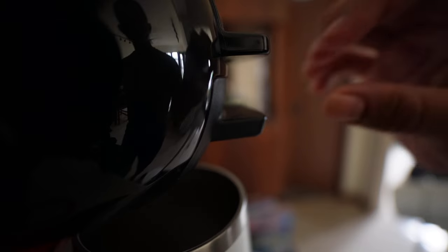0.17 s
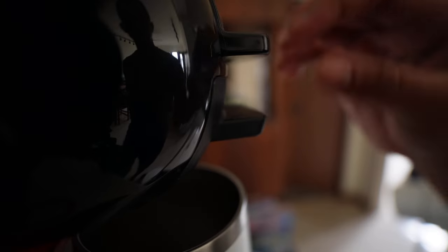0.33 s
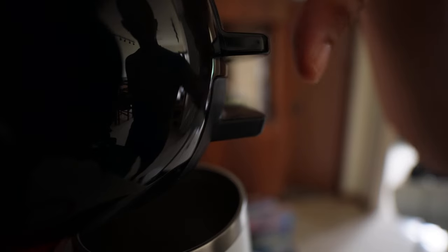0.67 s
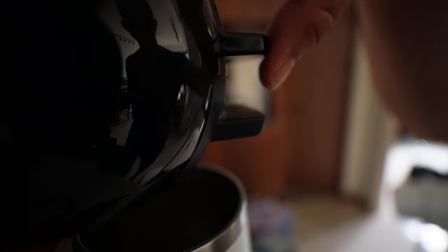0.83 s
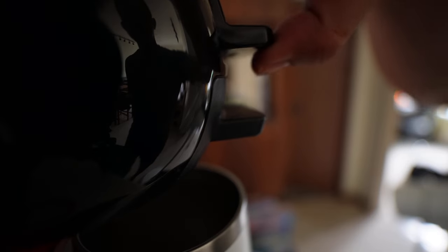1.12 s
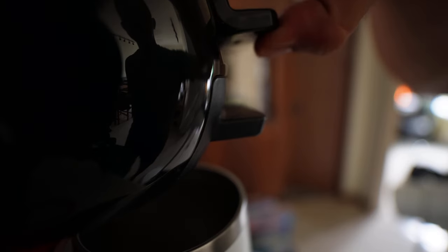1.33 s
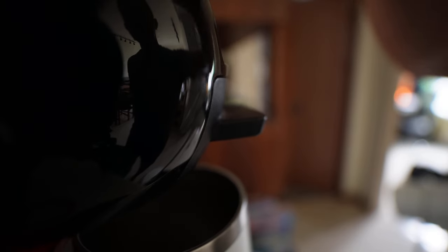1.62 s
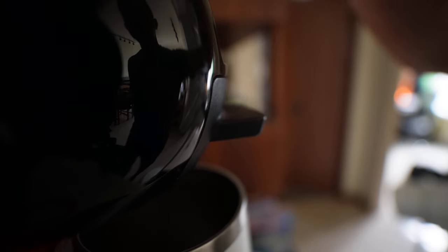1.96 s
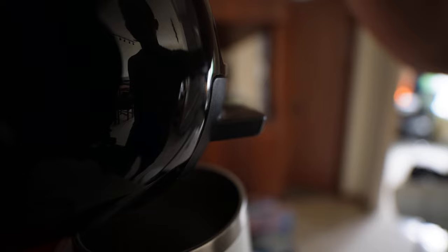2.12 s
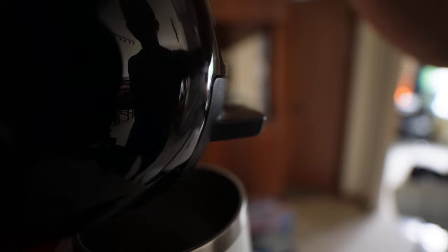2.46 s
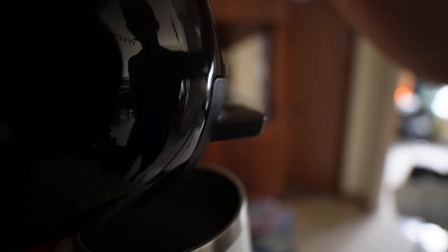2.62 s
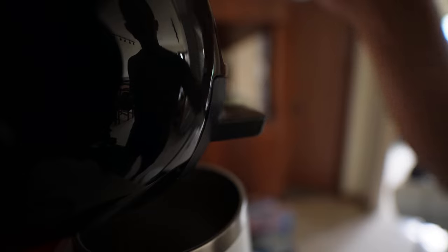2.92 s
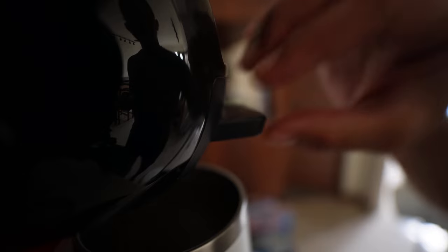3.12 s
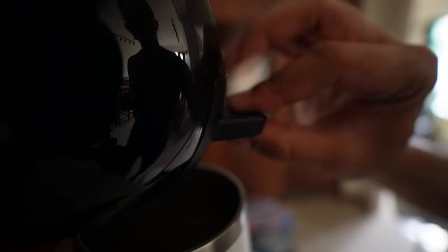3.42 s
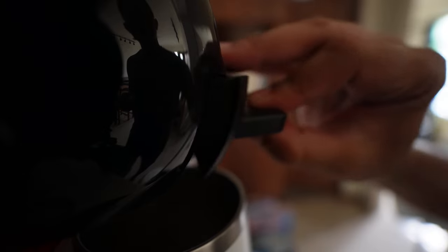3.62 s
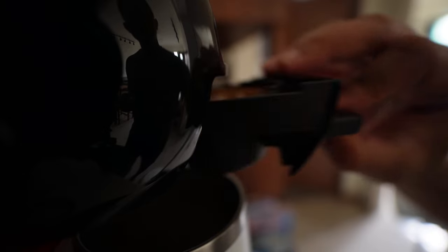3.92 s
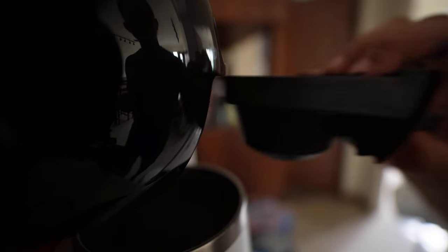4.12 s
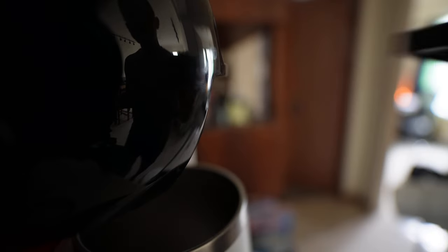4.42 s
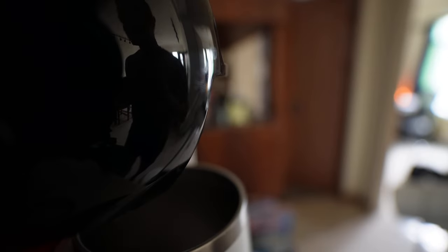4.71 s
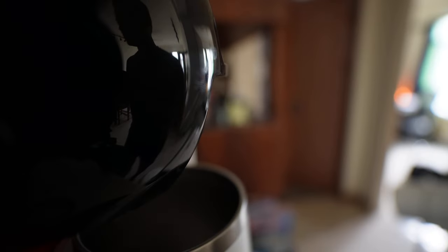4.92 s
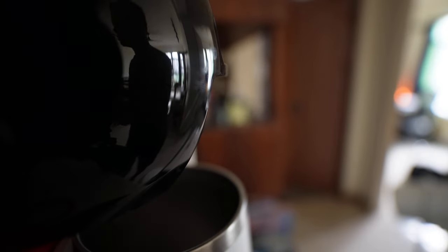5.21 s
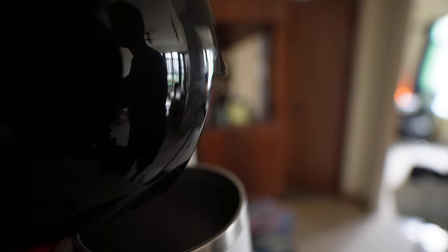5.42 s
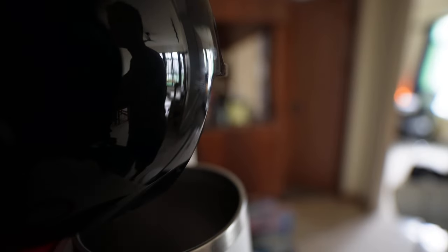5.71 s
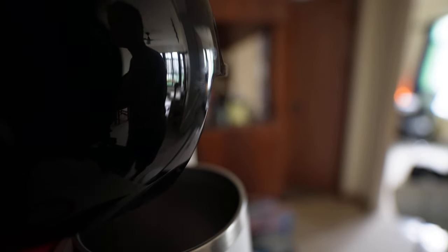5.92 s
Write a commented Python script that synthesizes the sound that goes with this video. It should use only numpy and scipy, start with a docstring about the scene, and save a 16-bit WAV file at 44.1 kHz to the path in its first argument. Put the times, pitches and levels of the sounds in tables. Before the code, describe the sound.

Faint, steady room noise fills a small kitchen. From about 0.9 seconds, close to the microphone, the lever of a capsule coffee machine ratchets up in a quick, uneven run of sharp plastic clicks and hollow knocks. At 1.6 seconds the capsule drops inside with a loud knock, bounces and briefly rumbles to rest. A click at 2 seconds leads to the loudest clack at 2.2 as the lever opens. The room rings lightly after each hit. Following a pause, the holder unlatches at 3.4 seconds, scrapes softly out of its slot until 4, and comes free with a few light knocks. A very faint, high camera focus whine comes and goes. At 5.6 seconds, further off, a tap hisses air, then spurts water into a steel sink around 5.8 with a short, drumming splash and a soft low boom.

```python
"""Capsule coffee machine in a small kitchen

Close to the microphone a lever ratchets up and clacks open; the capsule drops inside and rolls to rest.
Each plastic contact snaps and rings the shell and hollow housing. The holder unlatches and scrapes out.
Further off, a tap hisses air and spurts water into a steel sink. The room rings behind the machine,
and the camera's focus motor whines faintly over the room tone."""
import sys
import numpy as np
from scipy import signal
from scipy.fft import rfft, irfft
from scipy.io import wavfile
from scipy.ndimage import uniform_filter1d

SR = 44100
rng = np.random.default_rng(int(sys.argv[2]) if len(sys.argv) > 2 else 0)


def int16_out(signal):
    """Quantize to a 16-bit WAV file."""
    q = np.round(np.clip(np.atleast_2d(signal).T, -1, 1) * 32767)
    wavfile.write(sys.argv[1], SR, q.astype(np.int16))


N = 267731
BINS = np.fft.rfftfreq(2048, 1 / SR)

# Close up: the lever ratchets and strains, the capsule drops (1.58 s), the lever clacks open (2.2 s),
# the holder unlatches (3.4 s) and knocks free. Levels are energies over 10 ms.
# (time [s], body level [dB], main resonance [Hz], second resonance [Hz], knock drive [dB], snap [dB])
CONTACTS = [ (.8385, -51, 1460, 780, -61, -69), (.8943, -52, 780, 1770, -57, -60),
            (.95, -35, 1050, 1490, -42, -43), (.956, -28, 1020, 590, -39, -48),
            (.983, -30, 3500, 2210, -62, -32), (.988, -25.5, 2260, 1540, -42, -37),
            (1.0095, -32, 1970, 3500, -55, -34), (1.07, -37, 1970, 1340, -52, -49),
            (1.0955, -47, 1720, 580, -67, -55), (1.142, -37, 970, 1580, -47, -54),
            (1.154, -36, 1970, 1070, -49, -57), (1.1727, -32.5, 1340, 1720, -52, -51),
            (1.18, -48, 560, 3310, -53, -49), (1.2053, -25.5, 2300, 890, -42, -47),
            (1.2162, -26, 2080, 740, -35.5, -49), (1.2343, -29, 1920, 1240, -49, -44),
            (1.2897, -29.5, 1500, 2320, -52, -41), (1.303, -27, 760, 3140, -35, -40.5),
            (1.3098, -42, 560, 1020, -40, -61), (1.331, -35, 1080, 530, -35, -55),
            (1.335, -32, 540, 920, -36, -59), (1.3583, -28, 970, 663, -37, -44.5),
            (1.428, -28, 540, 820, -31, -46), (1.4536, -31, 580, 940, -43, -51),
            (1.485, -35, 1020, 725, -43, -61), (1.534, -40, 1380, 820, -44, -72),
            (1.548, -28, 660, 1540, -32, -52.5), (1.5543, -31.5, 560, 910, -36, -50),
            (1.577, -31.5, 870, 2030, -48, -45), (1.5874, -13, 820, 1250, -24, -29.5),
            (1.601, -26.5, 530, 1350, -32, -42), (1.608, -23.5, 530, 1180, -30, -44),
            (1.626, -32.5, 1900, 590, -30, -40), (1.699, -32, 890, 1920, -40, -54),
            (1.704, -22, 1580, 630, -28, -46), (1.7403, -29, 1580, 580, -42, -57),
            (1.83, -41, 2890, 1410, -50, -58), (2, -25, 2810, 1910, -45, -40.5),
            (2.03, -39, 590, 700, -48, -57), (2.067, -39.5, 660, 524, -54, -70),
            (2.193, -19, 1710, 1850, -30, -28), (2.198, -21.5, 1630, 1950, -29, -36),
            (2.2005, -16.5, 1870, 1240, -47, -33), (2.2024, -11.5, 1970, 1070, -35, -23.5),
            (2.2126, -24, 1670, 2360, -25, -35), (2.2175, -20, 1580, 750, -26.5, -41.5),
            (2.229, -37, 530, 1500, -35, -41), (2.567, -49, 1110, 590, -43, -70),
            (3.215, -41.5, 760, 1700, -49, -65), (3.402, -33.5, 780, 1200, -44, -63),
            (3.4207, -27.5, 1820, 650, -42, -48), (3.424, -37, 1900, 2800, -50, -43),
            (3.44, -42.5, 530, 2890, -45, -58), (3.544, -41, 810, 676, -46, -71),
            (3.574, -40, 590, 780, -46, -72), (3.592, -43, 600, 850, -50, -71),
            (3.623, -37, 800, 1200, -44, -66), (3.668, -38, 660, 856, -41, -73),
            (4.031, -33, 840, 1180, -45, -51), (4.1604, -34, 700, 1170, -48, -56),
            (4.164, -37, 1170, 600, -40.5, -66)]
# The holder ringing on its own, out of its slot: (frequency [Hz], relative level [dB], t60 [s])
HOLDER_MODES = [(288, 0, .1), (463, -11, .12), (830, -6, .06), (1165, -7, .045)]
STRAIN_S, HOLDER_FREE_S = (1.28, 1.56), 4
def machine_contact(s, body_db, hz, second_hz, knock_db, snap_db):
    """One blow in the machine; while the lever strains against the capsule it jolts the counter harder."""
    strained = STRAIN_S[0] < s < STRAIN_S[1]
    push_db = knock_db + (-4 if strained else -12.5)
    t = np.arange(6144) / SR
    sound = plastic_click(t, body_db, hz, second_hz, snap_db) + housing_knock(t, knock_db, push_db)
    if s > HOLDER_FREE_S:
        sound += sized(ring(t, HOLDER_MODES, scatter_db=1), knock_db + 6)
    return sound


def lever_ticks(count):
    """Faint catches of the lever at random moments, as rows like those of CONTACTS."""
    times = rng.uniform(1.15, 1.8, count)
    pitches = 1400 * 2 ** rng.uniform(-.5, .5, count)
    return [(s, -51, hz, hz / 2, -57, -63) for s, hz in zip(times, pitches)]


# Body of a struck plastic part: (frequency [Hz], relative level [dB])
PLASTIC_SPECTRUM = [(250, -31), (480, -8), (650, 0), (1300, -2.5), (2000, -2), (3000, -4), (3800, -13.5),
                    (6000, -27.5), (12000, -70)]
# Bright snap of its edge: (frequency [Hz], relative level [dB])
SNAP_SPECTRUM = [(1200, -47), (2800, -18.5), (4000, 1), (5500, -4.5), (6700, 0.5), (8500, -6),
                 (10000, -3.5), (14000, -7), (16500, -11)]
# The machine's thin shell: (frequency [Hz], relative level [dB], t60 [s])
SHELL_MODES = [(646, -1, 0.12), (722, -1.5, .06), (871, -2, 0.085), (1003, 3, 0.0666), (1168, -2, .06),
               (1238, -5, .1), (1662, -4.5, .07), (1843, -1, 0.039), (2480, -9, .09), (2665, -8.5, 0.088),
               (4520, -24, .08)]
USUAL_BLOW_DB, LONGEST_T60_S = -32, .065
def plastic_click(t, body_db, hz, second_hz, snap_db):
    """The struck part rings briefly at two resonances, the shell answers and the edge snaps."""
    weight_db = body_db - USUAL_BLOW_DB
    soft_db = max(body_db - snap_db, 0)
    # soft contacts rattle longer; small, high parts die sooner
    t60 = min((.012 + .00105 * soft_db) * (hz / 1000) ** -.5, LONGEST_T60_S)
    octaves = np.log2((BINS + 1) / hz)
    from_second = np.log2((BINS + 1) / second_hz)
    peaks = 1 / (1 + (octaves / .16) ** 2) + .85 / (1 + (from_second / .14) ** 2)
    resonances = peaks - .21 * np.minimum(abs(octaves), 2)
    prominence_db = 11.5 - .15 * weight_db  # heavy blows ring more broadly
    # each spot of the plastic favours its own set of close modes
    spot_db = 1.45 * unit_rms(uniform_filter1d(wander(len(BINS), 9), size=7))
    dulling_db = 3 * np.clip((soft_db - 20) / 12, 0, 1) * np.maximum(octaves, 0)
    body_curve = curve(PLASTIC_SPECTRUM) + prominence_db * resonances + spot_db - dulling_db
    body = sized(colour(chatter(t, t60, blow=.3), body_curve), body_db)
    shell = sized(ring(t, SHELL_MODES), body_db - 13)
    top_octaves = np.clip(np.log2((BINS + 1) / 5500), 0, 1.2)
    top_db_per_octave = -2.5 - .2 * weight_db - .28 * soft_db  # heavy or soft blows snap duller
    snap_curve = curve(SNAP_SPECTRUM) + spot_db + top_octaves * top_db_per_octave
    snap = sized(colour(chatter(t, t60 * .73, blow=.42), snap_curve), snap_db)
    return body + shell + snap


# Low push on the counter, also the water's thud in the sink: (frequency [Hz], relative level [dB])
THUD_SPECTRUM = [(20, -2.5), (50, -1), (95, -3.5), (150, -1.5), (220, -4), (400, -33.5), (1500, -64)]
# Hollow knock of the housing: (frequency [Hz], relative level [dB])
KNOCK_SPECTRUM = [(100, -26), (160, -13), (220, -8.5), (290, -0.5), (480, -4), (800, -20), (2500, -56)]
# Ring of the housing: (frequency [Hz], relative level [dB], t60 [s])
HOUSING_MODES = [(145, -8.5, .06), (239, -6, .05), (282, 1, 0.096), (308, -1.5, 0.055), (462.2, -4, 0.1)]
def housing_knock(t, knock_db, push_db):
    """The whole machine is jolted on the counter, and its hollow housing swells after the blow."""
    jolt = chatter(t, .046, blow=.25)
    push = sized(colour(jolt, curve(THUD_SPECTRUM)), push_db)
    knock = sized(colour(jolt, curve(KNOCK_SPECTRUM)), knock_db - 2)
    grip = 1 + .025 * rng.standard_normal()  # the hand's changing grip shifts the pitch a little
    housing = ring(t * grip, HOUSING_MODES, scatter_db=2.5) * (1 - fade(t, .018))
    return push + knock + sized(housing, knock_db - 3.5)


def capsule_roll():
    """The dropped capsule rolls to rest in its bin, rumbling in the hollow housing."""
    bumps = grains(per_s=900, spread_db=1.6)
    knocks = amp(-43) * unit_rms(colour(bumps, curve(KNOCK_SPECTRUM)))
    thuds = amp(-45) * unit_rms(colour(bumps, curve(THUD_SPECTRUM)))
    return (knocks + thuds) * burst(s=1.63, db=0, t60=.65)


# Pulls on the holder, close to the microphone: (time [s], length [s], level [dB])
HOLDER_PULLS = [(3.56, .11, -48), (3.68, .28, -47.5)]
# The holder rubbing in its slot: (frequency [Hz], relative level [dB])
SCRAPE_SPECTRUM = [(150, -25), (400, -1.5), (680, -3.5), (800, -5.5), (930, 0), (1080, -9), (1220, -3.5),
                   (1450, -10), (1750, -7), (2200, -19), (2800, -10), (3500, -21.5), (7000, -27),
                   (16000, -39)]
def holder_slide():
    """Plastic catches and slips on plastic; each pull swells and eases off."""
    speed = np.zeros(N)
    for s, length, db in HOLDER_PULLS:
        add(speed, s, amp(db) * np.sin(np.linspace(0, np.pi, round(length * SR))))
    slips = grains(per_s=2500, spread_db=1.6)
    return unit_rms(colour(slips, curve(SCRAPE_SPECTRUM))) * speed


# The tap's jet, further from the microphone: (frequency [Hz], relative level [dB])
JET_SPECTRUM = [(240, -35), (400, -7), (425, -13), (626, -13), (789, 0), (893, -10), (1270, -8), (1760, -2),
                (2510, -5.5), (7630, -4), (16000, -26)]
WATER_ARRIVES_S = 5.84
def tap_jet():
    """Air hisses out first, then the water arrives with a spit and its spray dies away."""
    air = burst(s=5.612, db=-38.5, t60=.85, rise_s=.035)
    spit = burst(WATER_ARRIVES_S, db=-33, t60=.07)
    spray = burst(WATER_ARRIVES_S, db=-42, t60=.7)
    return shaped_noise(JET_SPECTRUM) * (air + spit + spray)


# Water splashing in the sink: (frequency [Hz], relative level [dB])
SPLASH_SPECTRUM = [(50, -24), (120, -14.5), (320, -13.5), (480, -5.5), (630, -5.5), (770, -10),
                   (1000, -6.5), (1500, -11.5), (2100, -13.5), (2800, -19), (4600, -18.5), (6000, -31),
                   (10000, -42), (16000, -60)]
# Slugs of water on the steel: (time [s], splash drive [dB], t60 [s], spot pitch [Hz], ring level [dB])
WATER_SLUGS = [(5.763, -38.5, .09, 2125, -40.5), (5.82, -35.5, .11, 2200, -34.5),
               (5.84, -28.5, 0.14, 1000, -28), (5.86, -30.5, .07, 634, -26), (5.901, -37, 0.063, 626, -34)]
# Resonances of the steel basin: (frequency [Hz], width [Hz], relative level [dB])
BASIN_MODES = [(507, 9.5, -8), (554, 29, -1), (642, 13.1, -2), (1004, 24, -4), (1560, 8.7, 1),
               (2120, 54, -9)]
BOOM_S, BOOM_HZ, BOOM_T60_S = 5.91, 58.5, 3
def steel_sink():
    """Water drums on the basin and lands with a thud; the steel basin booms low for half a second."""
    dribble = amp(-43 - 180 * abs(np.arange(N) / SR - WATER_ARRIVES_S))  # grows until the water arrives
    flow = dribble + burst(WATER_ARRIVES_S, db=-28.5, t60=.72)
    drops = unit_rms(grains(per_s=5000, spread_db=2.1)) * flow
    t = np.arange(SR // 2) / SR
    impacts = np.zeros(N)
    for s, db, t60, hz, ring_db in WATER_SLUGS:
        add(drops, s, amp(db) * rng.standard_normal(len(t)) * fade(t, t60))
        add(impacts, s, ring(t, [(hz, ring_db, t60)], scatter_db=1.5))
    splash_db = curve(SPLASH_SPECTRUM)
    splash_db -= 10 * np.log10(np.mean(amp(splash_db) ** 2))  # unit power gain
    water = colour(drops, splash_db - 2)
    steel = 2.7 * sum(amp(db) * resonate(water, hz, width) for hz, width, db in BASIN_MODES)
    thud = colour(chatter(t, t60=.14, blow=0), curve(THUD_SPECTRUM))
    add(impacts, 5.85, sized(thud, -39))
    boom = np.sin(2 * np.pi * BOOM_HZ * t) * fade(t, BOOM_T60_S) * (1 - fade(t, .092))
    add(impacts, BOOM_S, amp(-46) * boom)
    return water + steel + impacts


# Decay of the small kitchen: (frequency [Hz], t60 [s])
KITCHEN_DECAY = [(150, 0.01), (400, 0.5), (1000, 0.56), (2800, 0.63), (7000, 0.55), (15000, 0.7)]
# Strength of its reflections at the microphone: (frequency [Hz], relative level [dB])
KITCHEN_SPECTRUM = [(100, -5), (400, -12), (1000, -17.5), (2500, -20), (7000, -16.5), (15000, -17.5)]
def kitchen_reverb(x):
    """Dense reflections that build up and die band by band."""
    hz, t, bands = signal.stft(rng.standard_normal(SR), SR, nperseg=256)
    t60 = curve(KITCHEN_DECAY, hz)[:, None]
    decay = amp(curve(KITCHEN_SPECTRUM, hz)[:, None] - 60 * t / t60)
    unit_energy = np.sqrt(2 * np.log(1000) / t60 / SR)
    tail = signal.istft(bands * decay * unit_energy, SR, nperseg=256)[1]
    tail *= np.clip(np.arange(len(tail)) / SR / .0045, 0, 1)
    return signal.oaconvolve(x, tail)[:N]


# Moves of the camera's lens: (time [s], length [s], full-speed pitch [Hz], level [dB])
FOCUS_MOVES = [(.69, .11, 13500, -81), (.8, .1, 14800, -82), (.9, .07, 13100, -75), (1.66, .29, 13720, -72),
               (3.92, .53, 13700, -78), (4.12, .26, 11600, -82)]
# Tones of its motor: (multiple of the pitch [ratio], relative level [dB])
MOTOR_TONES = [(1, 0), (.955, -3), (.58, -4)]
RUN_UP_S, ROUGHNESS_HZ = .014, 170
def focus_motor():
    """A thin, raspy whine that runs up, holds and runs down with the speed of the lens."""
    whine = np.zeros(N)
    for start, length, full_hz, db in FOCUS_MOVES:
        t = np.arange(round(length * SR)) / SR
        speed = 1 - .16 * (np.exp(-t / RUN_UP_S) + np.exp((t - length) / RUN_UP_S))
        swell = np.sin(np.pi * t / length)
        for multiple, tone_db in MOTOR_TONES:
            hz = multiple * full_hz * speed + ROUGHNESS_HZ * wander(len(t), 40)
            flutter = amp(2.4 * wander(len(t), 400))
            tone = np.sin(2 * np.pi * np.cumsum(hz) / SR)
            add(whine, start, amp(db + tone_db) * unit_rms(tone * swell * flutter))
    return whine


# Wash of the house around the microphone: (frequency [Hz], relative level [dB])
WASH_SPECTRUM = [(20, -1.5), (70, -4), (170, 0.5), (400, -1.5), (800, -3.5), (1400, -6), (2100, -9.5),
                 (2750, -11.5), (3400, -19), (5500, -26), (8200, -26.5), (10800, -37), (16000, -40)]
# Its slight swell: (time [s], level [dB])
WASH_LEVEL = [(0, -55), (3, -55.1), (5.6, -53.4), (6.07, -50)]
# Hollow drones and a faint whistle: (frequency [Hz], width [Hz], level [dB])
DRONES = [(155.6, 20, -69.5), (247.3, 33, -70.5), (411, 45, -75), (1383, 63, -77.5), (2590, 125, -76),
          (14900, 350, -87.5)]
# A faint hiss: (frequency [Hz], relative level [dB])
HISS_SPECTRUM = [(300, -12), (1500, 0), (2700, -1.5), (3400, -7), (5500, -10), (8200, -13), (11000, -29),
                 (16000, -36)]
# The hiss creeping in: (time [s], level [dB])
HISS_LEVEL = [(2.8, -85), (3.3, -66), (4.4, -66), (4.8, -63), (5.6, -61)]
def room_tone():
    """Behind everything, the wash of the house swells with its drones, and a hiss slowly grows."""
    wash = shaped_noise(WASH_SPECTRUM)
    noise = rng.standard_normal(N)
    drones = np.zeros(N)
    for hz, width, db in DRONES:
        drones += amp(db) * unit_rms(resonate(resonate(noise, hz, width), hz, width))
    swell = follow(WASH_LEVEL)
    hiss = shaped_noise(HISS_SPECTRUM) * follow(HISS_LEVEL)
    return wash * swell + drones * unit_rms(swell) + hiss


def chatter(t, t60, blow):
    """One sharp blow and its dying rattle, which together drive all frequencies about equally."""
    dying = fade(t, t60)
    rattle = rng.standard_normal(len(t)) * dying
    rattle /= np.linalg.norm(rattle)
    rattle[0] += blow
    for _ in range(3):  # flatten the spectrum, then restore the decay
        spectrum = rfft(rattle)
        flat = irfft(spectrum / (abs(spectrum) + 1e-9), len(t))
        rattle = flat * np.sqrt(np.minimum(3 * dying, 1))
    return rattle


def ring(t, modes, scatter_db=3):
    """Dying modes; every blow lands elsewhere and weights them anew."""
    sound = np.zeros(len(t))
    for hz, db, t60 in modes:
        weight = amp(db + scatter_db * rng.standard_normal()) * rng.choice([-1, 1])
        sound += weight * np.sin(2 * np.pi * hz * t) * fade(t, t60)
    return sound


def grains(per_s, spread_db):
    """Random tiny impacts of uneven size."""
    size = amp(spread_db * np.minimum(rng.exponential(1, N), 4))
    return size * rng.standard_normal(N) * (rng.random(N) < per_s / SR)


def shaped_noise(spectrum):
    """Steady noise of rms 1 with this spectrum."""
    return unit_rms(colour(rng.standard_normal(N), curve(spectrum)))


def wander(count, span):
    """Random drift of rms 1, smoothed over span points."""
    return unit_rms(uniform_filter1d(rng.standard_normal(count), size=span))


def colour(x, db):
    """Causal filter with the gain db on BINS: nothing rings before a blow."""
    cepstrum = irfft(np.log(amp(db)))
    half = len(cepstrum) // 2
    cepstrum[1:half] *= 2
    cepstrum[half + 1:] = 0
    return signal.oaconvolve(x, irfft(np.exp(rfft(cepstrum))))[:len(x)]


def resonate(x, hz, width):
    """A resonance of gain 1."""
    return signal.lfilter(*signal.iirpeak(hz, hz / width, fs=SR), x)


def curve(points, hz=BINS):
    """Interpolates a table on a log-frequency axis."""
    f, value = np.transpose(points)
    return np.interp(np.log(hz + 1), np.log(f + 1), value)


def follow(rows):
    """A dB curve as a gain for every sample."""
    return amp(np.interp(np.arange(N) / SR, *np.transpose(rows)))


def burst(s, db, t60, rise_s=.002):
    """A gain that rises at s seconds and dies away."""
    t = np.maximum(np.arange(N) / SR - s, 0)
    return amp(db) * (1 - np.exp(-t / rise_s)) * fade(t, t60)


def fade(t, t60):
    """Exponential decay, 60 dB down at t60."""
    return np.exp(-np.log(1000) * t / t60)


def amp(db):
    """Decibels to gain."""
    return 10 ** (np.asarray(db) / 20)


def unit_rms(x):
    """Scales to rms 1."""
    return x / np.sqrt(np.mean(x ** 2) + 1e-20)


def sized(x, db):
    """Gives a short sound the energy of 10 ms at this level."""
    return x * amp(db) * np.sqrt(SR / 100 / (np.sum(x ** 2) + 1e-20))


def add(mix, s, sound):
    """Puts a sound into the mix at s seconds."""
    part = mix[round(s * SR):][:len(sound)]
    part += sound[:len(part)]


def scene():
    """One microphone in the kitchen: the machine close by with its reflections, the sink further off."""
    machine = holder_slide() + capsule_roll()
    for s, *blow in CONTACTS + lever_ticks(count=4):
        add(machine, s, machine_contact(s, *blow))
    return (machine + kitchen_reverb(machine) + tap_jet() + steel_sink() + focus_motor() + room_tone())[None]


CLIP_LEVEL, BAND_LIMIT_HZ = .9, 16050
def record(dry):
    """The recorder clips peaks near full scale, then cuts the highest treble."""
    lowpass = signal.firwin(401, BAND_LIMIT_HZ, window=("kaiser", 8), fs=SR)
    return signal.oaconvolve(np.clip(dry, -CLIP_LEVEL, CLIP_LEVEL), lowpass[None], "same", axes=1)


dry = scene()
out = record(dry)
int16_out(out)
```